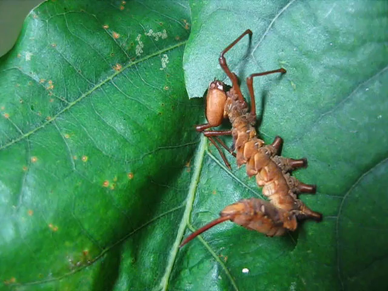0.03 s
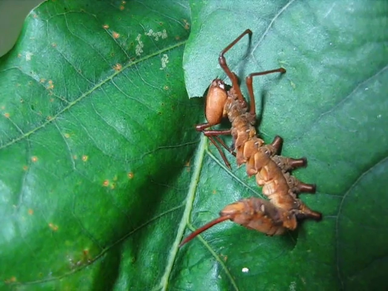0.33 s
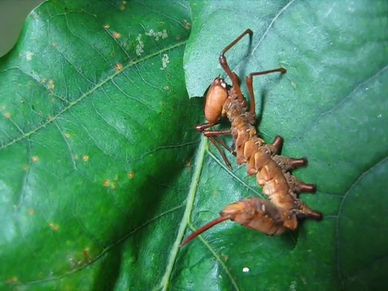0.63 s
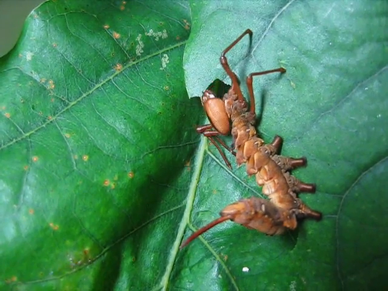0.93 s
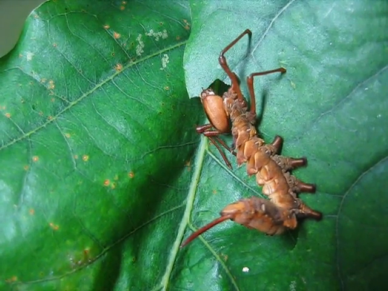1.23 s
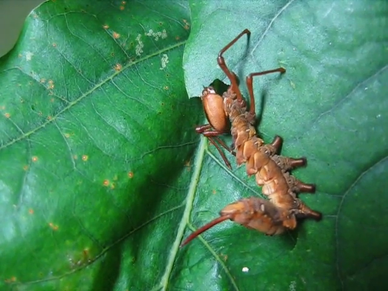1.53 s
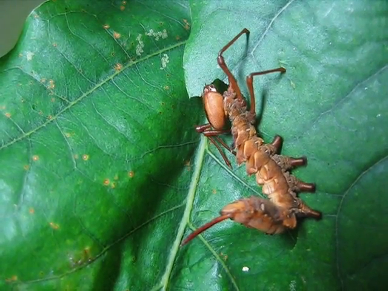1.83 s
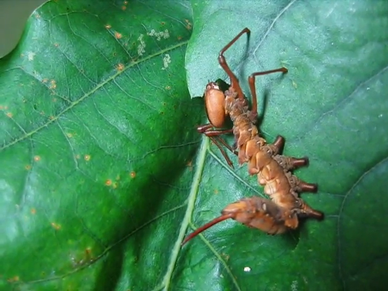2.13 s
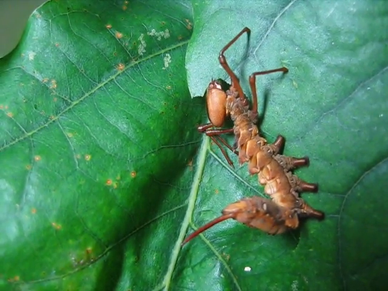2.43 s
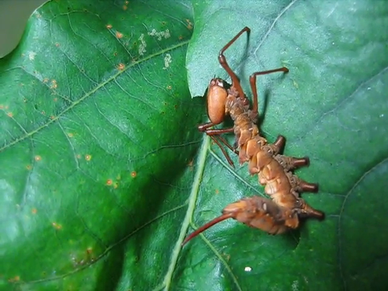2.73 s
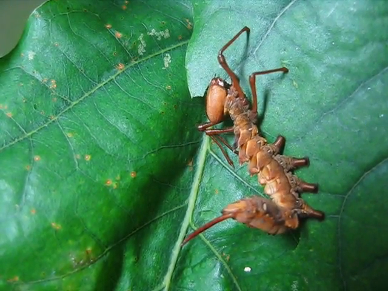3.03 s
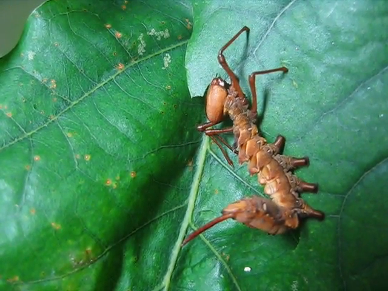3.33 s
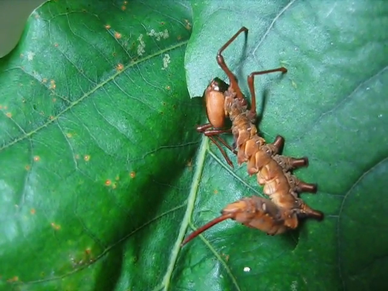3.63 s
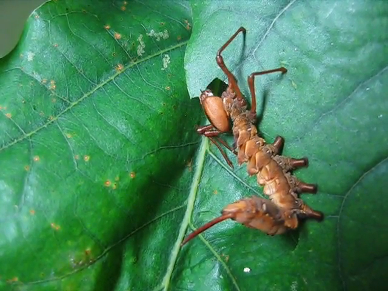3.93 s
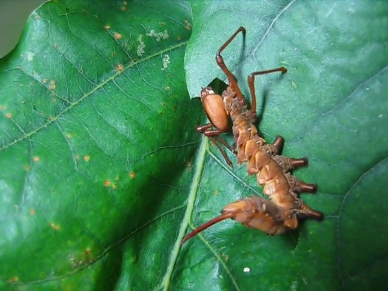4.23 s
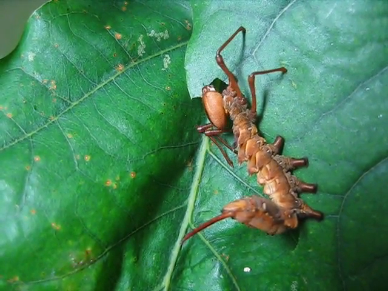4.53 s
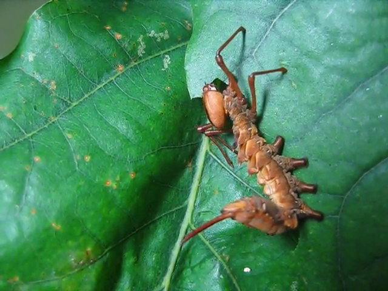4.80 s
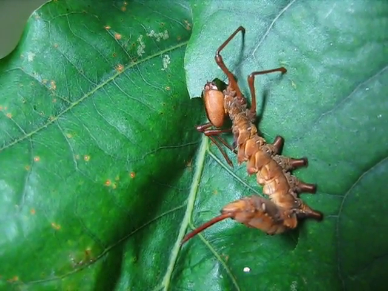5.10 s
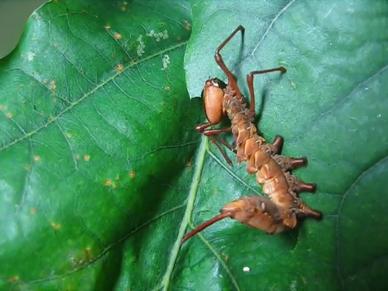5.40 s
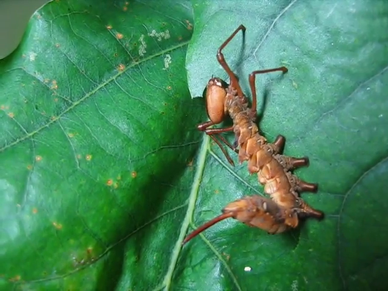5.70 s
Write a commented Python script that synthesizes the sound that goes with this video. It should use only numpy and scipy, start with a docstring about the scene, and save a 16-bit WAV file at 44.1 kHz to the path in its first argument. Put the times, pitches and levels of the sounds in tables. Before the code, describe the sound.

A quiet room with a low hum and steady hiss is heard throughout the roughly six seconds. Very close to the microphone, a caterpillar bites through the edge of a leaf. Each bite is a tiny, dry, high click with a faint crackle of tearing tissue just before it. The bites come unevenly, about four a second, and vary widely in strength.

Faint ticks begin at 0.2 seconds, followed by a clear snap at 0.7 and a louder one at 1.7. Around 2 seconds, a soft, low, papery tap on the leaf falls between two moderate clicks. Another loud, sharp snap comes at 2.8 seconds. Lighter nibbling follows, with a firmer click at 4.1 and very faint ticks up to about 5 seconds. These grow a little and lead to a last sharp snap at 5.7. The sound is dry, with hardly any echo.

```python
"""A quiet room comes up first, with a low hum and the recorder's hiss. Then, very close to the
microphone, a caterpillar eats the edge of a leaf. Its jaws rasp through the tissue and snap fibres;
every snap rings the leaf blade for a few milliseconds. About two seconds in, something taps the leaf
softly. Nearby surfaces return a faint wash of the leaf's sounds."""
import sys
import numpy as np
from scipy import signal
from scipy.fft import rfft, irfft
from scipy.io import wavfile

SR = 44100
rng = np.random.default_rng(int(sys.argv[2]) if len(sys.argv) > 2 else 0)


def dump_mix(stems):
    """Bounce the given channels to the path in sys.argv[1] as a 16-bit WAV at rate SR."""
    frames = np.atleast_2d(stems).T  # one column per channel
    limited = np.clip(frames, -1, 1)  # hard clip at full scale
    pcm = np.round(limited * 32767).astype(np.int16)
    wavfile.write(sys.argv[1], SR, pcm)


N = 254016
RING_TIME = np.arange(2048) / SR   # seconds since a blow

# The room tone's spectrum. Each row: frequency in Hz, relative level in dB.
ROOM_SPECTRUM = [(20, -8.5), (45, -1.5), (90, -1), (140, 0.5), (300, 0), (400, -2.5), (620, -1.5),
                 (900, -5.5), (1500, -8), (2600, -11.5), (4500, -15.5), (6500, -19), (9000, -43),
                 (16000, -16.5)]
# Resonances in the background. Each row: centre in Hz, half-width in Hz, rms level in dB.
ROOM_RESONANCES = [(171.6, 6.5, -66.5), (238.5, 12, -65), (633, 23, -75), (3400, 330, -70), (3930, 95, -79)]
# Machine hum and a thin electronic whine. Each row: frequency in Hz, rms level in dB.
STEADY_TONES = [(176, -64), (247, -74), (604, -75.5), (1007.3, -73), (15734, -85)]
# The ringing leaf blade. Each row: frequency in Hz, relative peak height in dB, t60 in seconds.
BLADE_MODES = [(860, 0, 0.0074), (2104, 10.5, 0.026), (2667, 8, 0.016), (3183, 14, 0.026),
               (3434, 18, 0.0093), (3950, 16, 0.0083), (4610, 17, 0.0046), (5010, 14.5, 0.0066),
               (5850, 16.5, 0.006), (6380, 14.5, 0.0088), (6630, 4, 0.0082), (8650, 9, 0.0057),
               (9700, 8.5, 0.0024), (10400, 12.5, 0.014), (11740, 8.5, 0.016), (12800, -1, 0.0054),
               (14300, 0, .007), (15000, -29, .005)]
# The blade's registers. Each entry is a centre in Hz: low ping, middle, upper, treble.
REGISTERS_HZ = [2170, 3770, 5360, 9600]
# Fibres snapping between the jaws. Each row: time of the snap in seconds, relative energy in dB,
# boosts of the low ping, upper modes and treble in dB, squeeze before the snap in seconds.
BITES = [(0.2, -26, 17, -8, -1, 0.0031), (0.423, -24.5, 22, -7, -3, .003), (0.4565, -22, 9, -9, -15, .0197),
         (0.6933, -6.5, 6, 6.5, -10, 0.035), (1.1295, -29, 0, 6, -8, 0.037),
         (1.2999, -21.5, -2, -14, -16, 0.004), (1.477, -29, 6, -12, -16, .003),
         (1.7292, -0.5, -4, -0.5, -0.5, 0.063), (1.963, -14.5, 7, -9, -34, 0.0028),
         (2.1688, -13, 7, -6, -17, 0.021), (2.5594, -24.5, 13, -2, -21, .007),
         (2.7353, -28.5, 1, 2, -3, 0.0034), (2.8435, 0.5, 7.5, 4.5, -4, 0.0034),
         (3.0776, -26, 17, -10, 4, 0.024), (3.286, -20, 9, -8, 2, 0.011), (3.5164, -20.5, 18, 2, 3, 0.026),
         (4.1265, -12, 8, -2, 2, .0334), (4.133, -22, -8, -6, -8, .003), (4.338, -22, 17, 5, 13, 0.0033),
         (4.3545, -29, -2, 5, -1, .003), (4.6127, -23.5, 3, -18, -10, 0.0038),
         (4.7679, -30, 0, -29, -22, 0.0029), (4.814, -24.5, 11, -24, -22, 0.0028),
         (5.0187, -28, -2, -25, -22, .003), (5.2422, -19, 19, -25, -2, 0.0037),
         (5.4418, -16.5, 16, -10, 1, .009), (5.6887, -2.5, 8.5, -1, -1, 0.002)]
# The whole leaf bending. Each row: frequency in Hz, relative peak height in dB, t60 in seconds.
BENDING_MODES = [(215, 8, 0.036), (446, 4, 0.02), (540, 6.5, .018), (820, 5.5, 0.012), (1140, -2.5, .012),
                 (1396, 8, 0.028), (1650, -10, 0.0092), (1920, -5, 0.0092), (2530, -16, .012)]
# A soft touch on the leaf. Each row: start in seconds, relative energy in dB.
TAPS = [(2.0646, -18.5)]


def from_db(db):
    """Decibels to gain."""
    return 10 ** (np.asarray(db) / 20)


def unit_energy(x):
    """Scale so that the squares sum to one."""
    return x / np.sqrt(np.sum(x ** 2) + 1e-20)


def butter(x, hz, kind, order=2):
    """Causal Butterworth filter."""
    return signal.sosfilt(signal.butter(order, hz, kind, fs=SR, output="sos"), x)


def add(track, start_s, sound):
    """Mix a short sound into the track."""
    at = int(np.clip(round(start_s * SR), 0, N - 1))
    track[at:at + len(sound)] += sound[:N - at]


def noise(gain):
    """Steady noise with a given gain at each frequency; rms 1."""
    return unit_energy(irfft(rfft(rng.standard_normal(N)) * gain, N)) * np.sqrt(N)


def background(room_db=-51.5, hiss_db=-59):
    """Behind the leaf: dull room tone with a few resonances, steady hum and whine, flat recorder hiss."""
    t = np.arange(N) / SR
    hz = np.fft.rfftfreq(N, 1 / SR)
    curve_hz, curve_db = np.transpose(ROOM_SPECTRUM)
    spectrum_db = np.interp(np.log(hz + 1), np.log(curve_hz), curve_db)
    room = from_db(room_db) * noise(from_db(spectrum_db))
    resonances = sum(from_db(db) * noise(1 / (1 + ((hz - centre) / half_width) ** 2))
                     for centre, half_width, db in ROOM_RESONANCES)
    hiss = from_db(hiss_db) * noise(1)
    tones = sum(from_db(db) * np.sqrt(2) * np.sin(2 * np.pi * (pitch * t + rng.random()))
                for pitch, db in STEADY_TONES)
    return room + resonances + hiss + tones


def strike(modes, spread_db=1.5, detune=.008):
    """One blow on a set of modes; the place of contact shifts their strengths and pitches a little."""
    hz, db, t60 = np.transpose(modes)
    strength, shift = rng.standard_normal((2, len(hz)))
    amplitude = from_db(db + spread_db * strength) / t60
    pitch = hz * (1 + detune * shift)
    decay = from_db(-60 * RING_TIME / t60[:, None])
    return amplitude @ (decay * np.cos(2 * np.pi * pitch[:, None] * RING_TIME))


def disperse(x, centre_hz=4300, width_hz=4200):
    """Slower bending waves lag the treble: an all-pass turns a snap into a very short falling chirp."""
    radius = np.exp(-np.pi * width_hz / SR)
    denominator = [1, -2 * radius * np.cos(2 * np.pi * centre_hz / SR), radius ** 2]
    return signal.lfilter(denominator[::-1], denominator, x)


def snap(colour_db, radiate_hz=1700, splinter_db=-13, splinter_s=0.00083, top_hz=15950):
    """A fibre breaks, splinters and rings the blade; where it breaks sets which modes speak."""
    hz, db, t60 = np.transpose(BLADE_MODES)
    ping_db, upper_db, treble_db = colour_db
    boost_db = np.interp(np.log(hz), np.log(REGISTERS_HZ), [ping_db, 0, upper_db, treble_db])
    burst = rng.standard_normal(len(RING_TIME)) * np.exp(-RING_TIME / splinter_s)
    splinters = from_db(splinter_db) * unit_energy(burst)
    ring = strike(np.column_stack([hz, db + boost_db, t60]))
    ring = ring + signal.fftconvolve(ring, splinters)[:len(RING_TIME)]
    ring = disperse(butter(ring, radiate_hz, "high"))   # a small blade radiates little bass
    return unit_energy(butter(ring, top_hz, "low", order=4))


def rasp(lead_s=0.007, lead_share=.4, trail_s=0.0055, pressed_per_s=520, idle_per_s=16,
         crack_db=-41, spread_db=3.5, colour_db=(2, -3, -1), places=6):
    """Cell walls give way in tiny cracks at several places, crowding as the jaws squeeze to each snap."""
    t = np.arange(N) / SR
    pressure = np.zeros(N)
    for snap_s, *_, squeeze_s in BITES:
        rise_s = lead_s + lead_share * squeeze_s
        pressure += np.exp(-np.maximum((snap_s - t) / rise_s, (t - snap_s) / trail_s))
    cracking = rng.random(N) < (idle_per_s + pressed_per_s * pressure) / SR
    sizes = from_db(crack_db + spread_db * np.clip(rng.standard_normal(N), -2, 2))
    cracks = cracking * sizes * rng.choice([-1, 1], N)
    place = rng.integers(0, places, N)
    colours = np.array(colour_db) + rng.uniform(-4, 4, (places, len(colour_db)))
    return sum(signal.oaconvolve(cracks * (place == k), snap(colours[k]))[:N] for k in range(places))


def tear(colour_db, swell_s=0.0027, samples=400):
    """Tissue tears in a dense, swelling crackle; returns its lead on the snap in seconds and its sound."""
    cracks = rng.standard_normal(samples) * np.exp(-RING_TIME[:samples] / swell_s)
    return samples / SR, unit_energy(signal.fftconvolve(cracks[::-1], snap(colour_db)))


def bites(catch_db=-28.5, catch_follows=.15, tear_db=-34, tear_db_per_s=360,
          recoil_db=-13, recoil_limit_db=-24, recoil_band_hz=(650, 1600)):
    """The jaws catch, squeeze, tear and snap a fibre; the leaf springs back with a low knock."""
    out = np.zeros(N)
    for snap_s, db, *colour_db, squeeze_s in BITES:
        recoil = unit_energy(butter(strike(BENDING_MODES), recoil_band_hz, "band"))
        recoil_gain = from_db(min(db + recoil_db, recoil_limit_db))   # the leaf springs only so far
        lead_s, crackle = tear(colour_db)
        tear_gain = from_db(db + tear_db + tear_db_per_s * squeeze_s)   # a long squeeze tears louder
        catch = from_db(catch_db + catch_follows * db) * snap(colour_db)
        add(out, snap_s - squeeze_s, catch)
        add(out, snap_s - lead_s, tear_gain * crackle)
        add(out, snap_s, from_db(db) * snap(colour_db) + recoil_gain * recoil)
    return out


def leaf_tap(contact_hz=2200, settle_s=0.0042, settle_db=-7):
    """A soft touch bends the whole leaf, which gives a low, papery knock and settles just after."""
    out = np.zeros(N)
    for start_s, db in TAPS:
        for delay_s, drop_db in ((0, 0), (settle_s, settle_db)):
            knock = unit_energy(butter(strike(BENDING_MODES), contact_hz, "low", order=4))
            add(out, start_s + delay_s, from_db(db + drop_db) * knock)
    return out


def reflections(x, wet_db=-26, t60=0.059, build_s=0.0022, band_hz=(1800, 5000)):
    """Nearby surfaces send a faint, short and duller wash back to the microphone."""
    t = np.arange(SR // 4) / SR
    envelope = from_db(-60 * t / t60) * (1 - np.exp(-t / build_s))
    wash = butter(rng.standard_normal(len(t)) * envelope, band_hz, "band", order=1)
    return from_db(wet_db) * signal.fftconvolve(x, unit_energy(wash))[:N]


def scene(close_db=1.5):
    """One microphone right at the leaf, with the quiet room behind it."""
    leaf = from_db(close_db) * (bites() + rasp() + leaf_tap())
    return (leaf + reflections(leaf) + background())[None, :]


def record(dry, open_s=.061, muted_db=-42, notch_hz=7850, notch_width_hz=705, top_hz=15950):
    """The input opens after a moment; the recorder has a deep notch near 8 kHz and a steep top."""
    gate = np.where(np.arange(N) / SR < open_s, from_db(muted_db), 1)
    notch = signal.iirnotch(notch_hz, notch_hz / notch_width_hz, fs=SR)
    notched = signal.lfilter(*notch, signal.lfilter(*notch, dry * gate))
    return signal.sosfilt(signal.ellip(12, .2, 80, top_hz, fs=SR, output="sos"), notched)


dry = scene()
out = record(dry)
dump_mix(out)
```